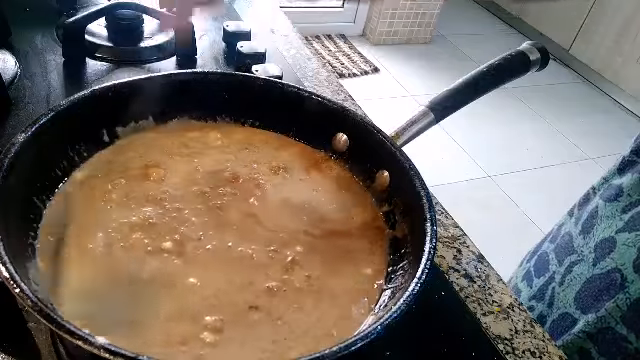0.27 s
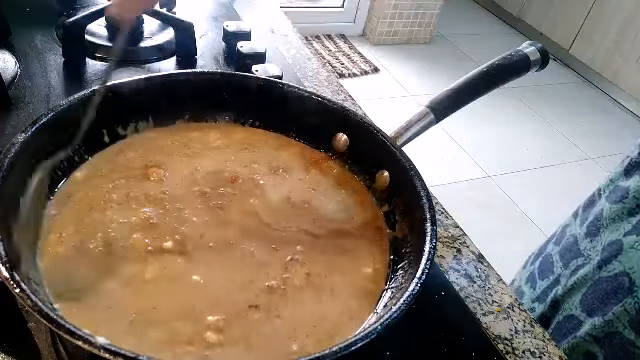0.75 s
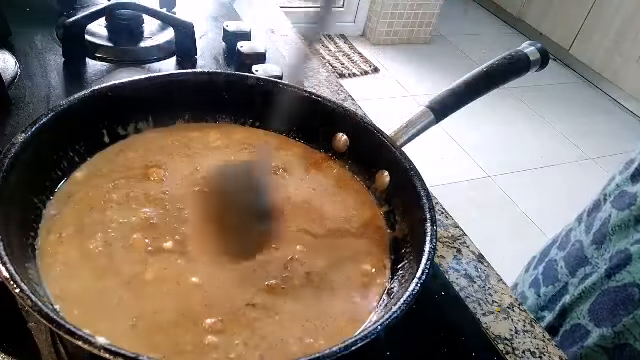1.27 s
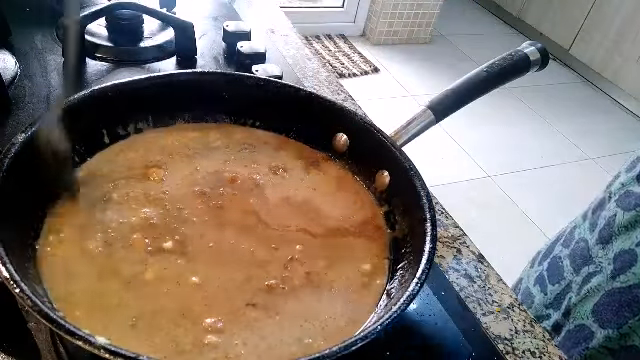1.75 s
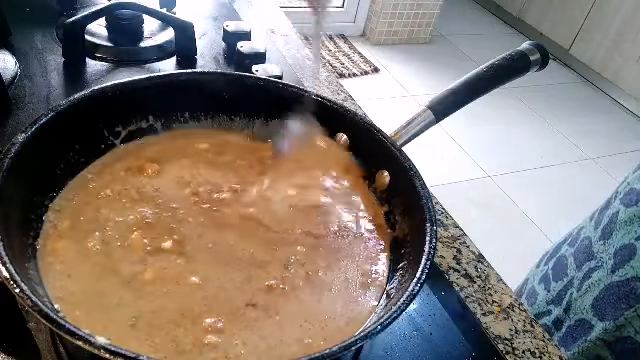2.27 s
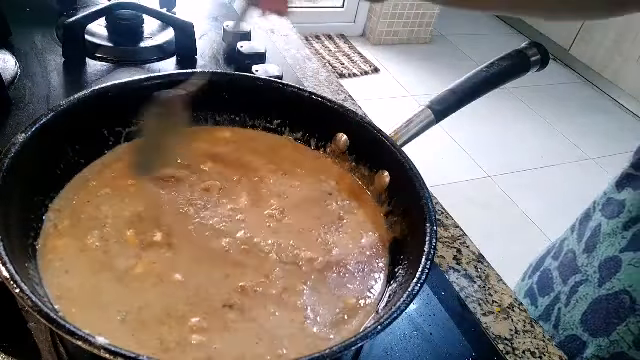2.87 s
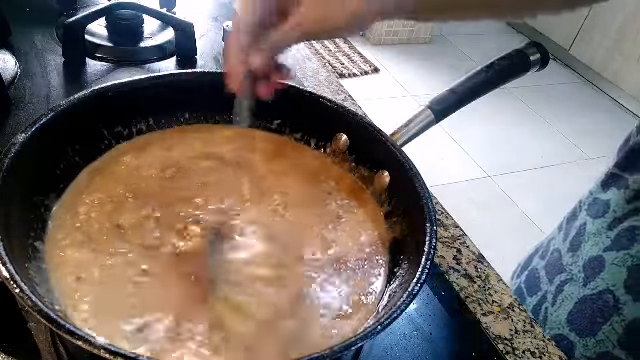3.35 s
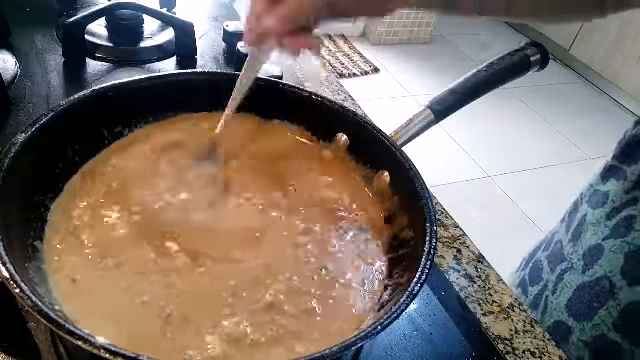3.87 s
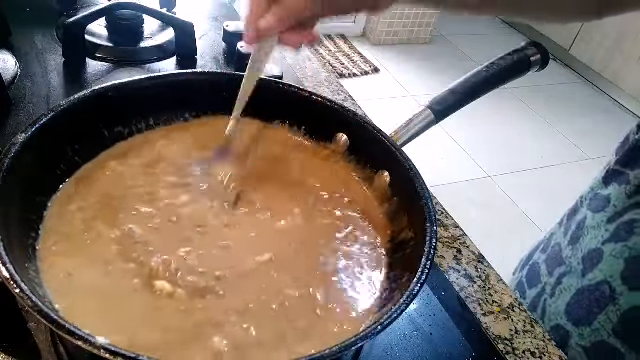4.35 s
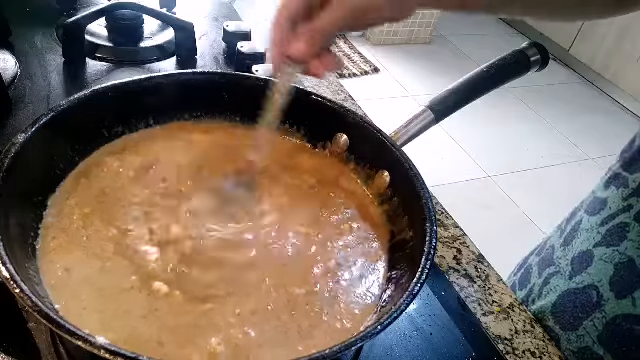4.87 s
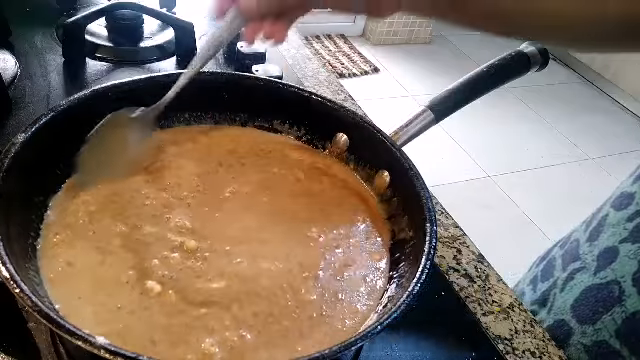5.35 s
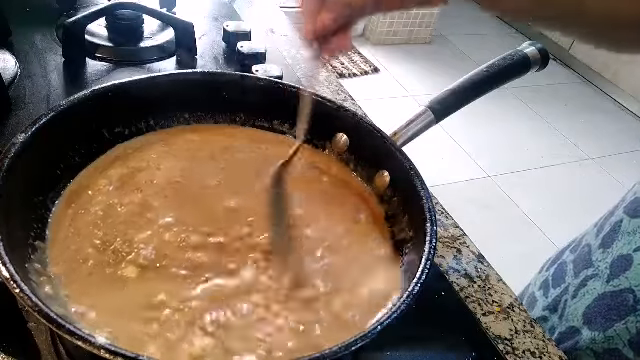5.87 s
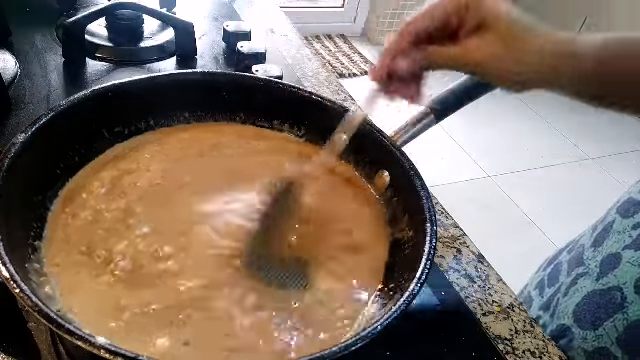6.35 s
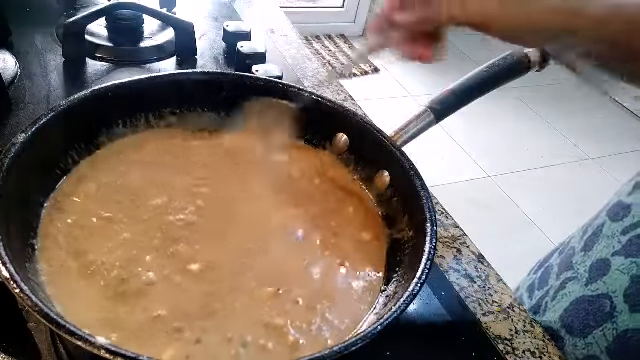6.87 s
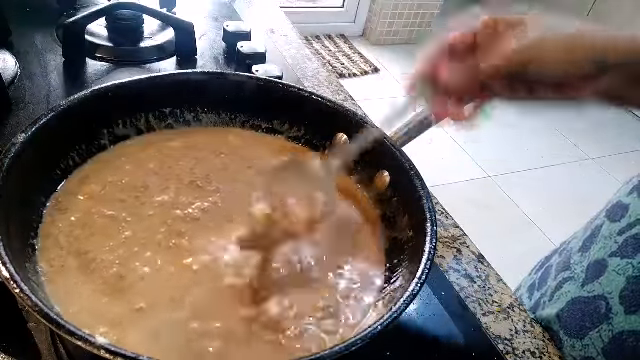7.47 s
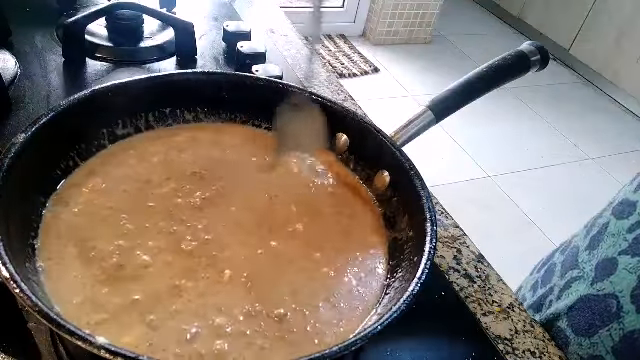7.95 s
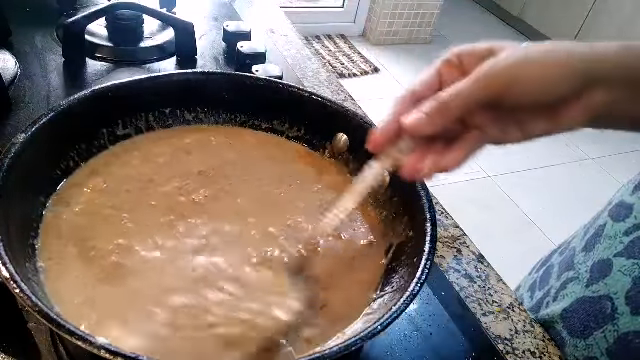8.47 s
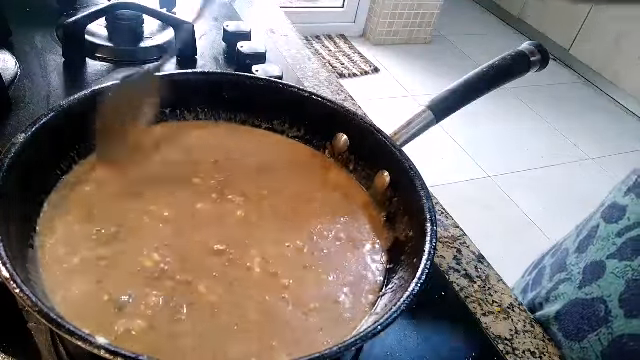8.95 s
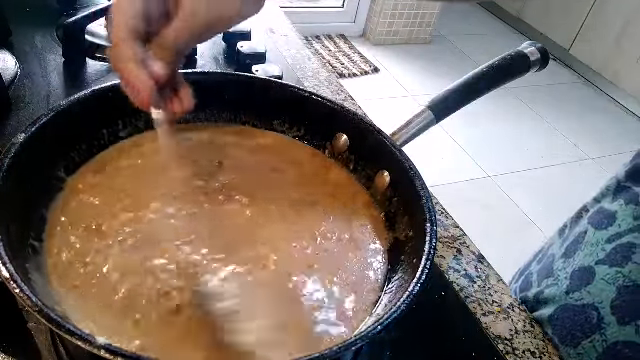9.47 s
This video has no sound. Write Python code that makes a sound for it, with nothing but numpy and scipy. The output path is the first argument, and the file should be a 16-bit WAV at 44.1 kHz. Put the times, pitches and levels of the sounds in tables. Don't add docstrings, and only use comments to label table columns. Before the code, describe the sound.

A close phone microphone in a small kitchen hears a steel spoon working thick food in a frying pan over a quiet, steady low fan hum. At 0.3-0.5 s gritty, bright scrapes run along the rim; a sharp knock at 0.8 leads to more rasping until 1.1. After a gap, stronger scrapes with short sung metallic tones fill 1.6-2.4, while airy sizzle and tiny spits are most noticeable. A quieter lull follows. From 3.05 to 3.5 wet bottom scrapes and clinks cluster, then softer strokes at 3.9-5.0. A knock and scrape come at 5.5, brisk clanks and higher rings at 6.2-6.45, scrapes at 6.8-7.3. The hardest clanks ring at 7.92 and 8.11, with a short room response and scraping tail. A near-quiet pause precedes a last run of uneven scrapes, 9.15-9.7.

```python
import sys
import numpy as np
from scipy import signal
from scipy.fft import rfft, irfft, next_fast_len
from scipy.io import wavfile
from scipy.ndimage import uniform_filter1d, map_coordinates

SR = 44100
rng = np.random.default_rng(int(sys.argv[2]) if len(sys.argv) > 2 else 0)


def to_wav(sig):
    pcm = np.clip(np.atleast_2d(sig), -1, 1) * 32767
    pcm = np.round(pcm).astype(np.int16)
    wavfile.write(sys.argv[1], SR, pcm.T)


def nominal_scale(level):
    x = np.asarray(level, float) / 20
    return 10 ** x


N = 428211

# land_s, full_s, lift_s, rasp_db, ring_db
RIM_STROKES = [(0.324, 0.398, 0.43, -39.5, -40.5), (0.462, 0.505, 0.51, -51, -43.5),
               (0.875, 0.93, 0.98, -39, -42.5), (0.954, 1.006, 1.005, -43, -39.5),
               (1.045, 1.067, 1.12, -48, -43), (1.657, 1.69, 1.81, -42.5, -39.5),
               (1.806, 1.87, 1.96, -50, -46), (2.184, 2.25, 2.322, -40, -46),
               (2.353, 2.39, 2.41, -48, -45.5)]
# land_s, full_s, lift_s, rasp_db, ring_db
BOTTOM_STROKES = [(-0.1, -0.05, 0.15, -66, -56.5), (0.144, 0.168, 0.35, -61, -49.5),
                  (0.776, 0.83, 0.84, -55.5, -46.5), (1.54, 1.58, 1.53, -58.5, -52),
                  (1.868, 1.917, 2, -48, -38.5), (2.004, 2.067, 2.186, -44, -36.5),
                  (2.742, 2.753, 2.745, -56, -72), (3.047, 3.15, 3.42, -52, -47.5),
                  (3.217, 3.306, 3.462, -44, -42.5), (3.375, 3.413, 3.506, -47, -50),
                  (3.85, 3.886, 3.946, -52, -49.5), (3.925, 4.026, 4.02, -53, -42.5),
                  (4.312, 4.337, 4.41, -55, -46), (4.413, 4.505, 4.6, -61, -46),
                  (4.507, 4.53, 4.3, -77, -43.5), (4.596, 4.62, 4.905, -48.5, -44),
                  (4.773, 4.8, 4.93, -56.5, -50), (4.846, 4.884, 4.96, -63, -70),
                  (5.494, 5.531, 5.69, -49, -49), (5.576, 5.63, 5.78, -57, -52.5),
                  (6.194, 6.2, 6.24, -55.5, -41.5), (6.293, 6.33, 6.35, -48, -41),
                  (6.342, 6.374, 6.4, -43, -34.5), (6.42, 6.44, 6.45, -60, -53),
                  (6.815, 6.846, 7.05, -52, -44.5), (6.902, 6.966, 7.12, -45.5, -41),
                  (7.062, 7.11, 7.15, -46, -44), (7.262, 7.272, 7.29, -59, -47),
                  (7.615, 7.63, 7.6, -63.5, -65), (7.922, 7.945, 8.35, -49, -48),
                  (7.96, 8.06, 8.23, -44.5, -56), (8.108, 8.103, 8.14, -40, -28.5),
                  (8.185, 8.214, 8.42, -78, -49), (9.151, 9.163, 9.19, -50.5, -47),
                  (9.2, 9.262, 9.38, -48.5, -44.5), (9.336, 9.39, 9.1, -50, -47.5),
                  (9.43, 9.493, 9.47, -48.5, -47.5), (9.55, 9.59, 9.66, -47, -48),
                  (9.652, 9.71, 9.45, -50.5, -52.5)]
# time_s, driven_pitch_hz, wall_db, bowl_db
CONTACT = [(0.1, 724, -3, -2.5), (0.28, 724, -3, -2), (0.36, 594, -1, -1.5), (0.45, 620, 4.5, 1.5),
           (0.6, 570, 1.5, -1), (0.8, 736, 6, 1), (0.93, 732, 0, -2.5), (1.0, 600, 3.5, -0.5),
           (1.2, 620, 0, -1.5), (1.68, 630, -6, 0.5), (1.75, 620, 1, 8), (1.84, 694, -5, -6.5),
           (1.93, 590, -5.5, -3), (2.01, 690, -5, -5.5), (2.12, 637, -4.5, -0.5), (2.2, 880, -2, 1.5),
           (2.32, 844, -8, 5), (2.4, 625, 4.5, 3.5), (3.1, 710, -8, 1.5), (3.3, 730, -14, 0),
           (3.45, 760, -12, 0), (4.0, 710, -24, 2), (4.3, 1050, -22, -0.5), (4.39, 1090, -15, 0.5),
           (4.44, 770, -15, -0.5), (4.74, 770, -23, -3.5), (4.79, 1110, -14, -2), (4.83, 1060, -9, -2.5),
           (4.88, 720, -11, -2), (5.52, 706, -4, -2), (5.66, 603, -7, 0), (6.2, 1030, -2, 1),
           (6.3, 1130, -2, 1.5), (6.42, 1270, -19, 3), (6.85, 724, -3.5, 2.5), (7.05, 746.6, -16, -1),
           (7.18, 940, -24, -2.5), (7.28, 614, 6, 0), (7.94, 980.3, 2, 0), (8.07, 950, -12, 0.5),
           (8.11, 640, -6.5, -1), (8.35, 650, -6, 1), (9.16, 790, -4.5, -2.5), (9.3, 770, -4, -2),
           (9.38, 652, -9.5, 0.5), (9.55, 620, -10, -4.5), (9.68, 690, -12, -6)]
# pitch_hz, width_hz, level_db
RIM_MODES = [(558.6, 19.3, -2.5), (603.5, 18, 0.5), (637.2, 18.3, 1)]
# pitch_hz, width_hz, level_db
BOTTOM_MODES = [(652.3, 12.8, -5), (724, 21, -0.5), (789, 13.4, -4.5), (872.4, 29, -9)]
# pitch_hz, width_hz, level_db
SIDE_MODES = [(1013, 36, 0), (1087.4, 24, 1), (1174, 35, -1), (1302, 40, -1), (1438, 60, -5.5),
              (940, 26, -5.5)]
# pitch_hz, width_hz, level_db
WALL_MODES = [(295, 25.5, -0.5), (343, 20.5, 1), (374.6, 19, 0), (423.4, 29.6, -7)]
# pitch_hz, width_hz, level_db
BOWL_MODES = [(1576, 80, -4.5), (1747, 260, -3), (2210, 180, -5), (2526, 98, -2), (2795, 70, 0),
              (2943, 49, 1), (3062, 45, 2), (3403, 540, -3)]
# pitch_hz, width_hz, level_db
HANDLE_MODES = [(3616, 67, -5.5), (4600, 67, -10), (4660, 18, -1.5), (5135, 26, 6), (5670, 33, -4)]
# pitch_hz, level_db (per Hz)
EDGE = [(3000, -43), (3750, -7), (4400, -2.5), (5100, 0), (6000, -8), (7600, -7), (8600, -14), (9500, -18),
        (10500, -56)]
# start_s, length_s, pitch_hz, level_db
SINGING = [(0.31, 0.088, 4628, -51), (0.322, 0.175, 647, -45), (0.339, 0.123, 1101, -50),
           (0.38, 0.082, 2740, -54), (0.386, 0.088, 5108, -48), (0.409, 0.082, 4640, -51),
           (0.595, 0.094, 625, -54), (0.96, 0.291, 634, -43), (1.639, 0.129, 655, -42),
           (1.732, 0.082, 1186, -49), (1.848, 0.088, 5025, -53), (1.877, 0.1, 654, -42),
           (1.947, 0.094, 721, -44), (2.005, 0.187, 652, -42), (2.179, 0.088, 3676, -52),
           (2.185, 0.1, 1826, -53), (2.203, 0.1, 1434, -52), (2.226, 0.088, 5076, -46),
           (2.243, 0.1, 715, -52), (2.365, 0.14, 660, -49), (3.12, 0.1, 715, -52), (3.236, 0.094, 723, -47),
           (3.334, 0.164, 769, -46), (3.985, 0.117, 719, -49), (4.519, 0.268, 755, -46),
           (4.763, 0.1, 1020, -48), (5.471, 0.274, 625, -47), (6.318, 0.111, 1177, -42),
           (6.806, 0.111, 717, -49), (6.899, 0.105, 4639, -52), (6.992, 0.256, 726, -43),
           (7.061, 0.088, 1269, -52), (7.061, 0.094, 3746, -52), (7.148, 0.082, 1037, -53),
           (7.241, 0.105, 628, -53), (7.996, 0.105, 886, -52), (7.996, 0.105, 968, -53),
           (8.234, 0.088, 1409, -52), (8.327, 0.094, 624, -51), (9.18, 0.193, 732, -43),
           (9.337, 0.239, 645, -46), (9.563, 0.111, 714, -52)]
# start_s, peak_db, ring_db, thud_db
KNOCKS = [(0.146, -36, -1, 1), (0.8063, -23.5, -0.5, -3), (1.8794, -29.5, -10, -3), (2.1084, -24, -8, -8),
          (2.2163, -27, 3, -14), (3.058, -24.5, -4.5, -26), (3.12, -35, -5, -3), (3.3157, -36.5, 7, 16),
          (3.43, -21, -18, -12), (3.438, -26, -14, -12), (3.467, -43, -12, -12), (3.8593, -34, -10, 7.5),
          (4.3114, -40.5, 2, 3), (4.8, -33, 6, -18), (5.497, -25, -4, -10), (6.1985, -21, -3, -0.5),
          (6.206, -26, 2.5, 4.5), (6.2394, -30, -4, 4), (6.8197, -35, 0, -6), (7.2645, -42, 15, 20),
          (7.9245, -13.5, -10, -6.5), (8.113, -10, -6.5, -17), (8.7745, -59, 16, 18),
          (8.8696, -50, -2.2, 17), (9.153, -30.5, -9, -16), (9.3366, -36, -6, 0)]
# start_s, peak_db
CATCHES = [(0.3431, -47), (0.069, -51), (0.169, -41), (0.1927, -36), (0.7083, -52.5), (0.7517, -47),
           (0.877, -37.5), (0.926, -43), (1.5723, -40), (1.6162, -50), (1.6671, -35), (2.257, -35),
           (3.049, -44), (4.3515, -46), (4.5095, -36.5), (4.602, -38), (4.62, -36), (4.7033, -40),
           (4.8735, -46), (5.129, -40), (6.3455, -39), (6.4427, -26.5), (6.9304, -35), (7.4884, -54),
           (7.629, -33), (9.6056, -46)]
# pitch_hz, width_hz, level_db
CLANG_MODES = [(1040, 44, -1), (1416, 90, -1), (1820, 150, 3.5), (2740, 91, 7), (4640, 100, 1.5)]
# start_s, pitch_hz, peak_db
STRUCK_MODES = [(0.8063, 732, -39), (0.8063, 1303, -37), (0.8063, 2686, -42), (3.058, 716, -44),
                (3.058, 1367, -48), (3.058, 1846, -38), (3.058, 3068, -48), (3.3157, 581, -38),
                (3.43, 759, -35), (3.43, 2799, -33), (3.43, 3058, -35), (3.43, 4506, -40),
                (3.8593, 743, -48), (3.8593, 1303, -44), (5.497, 716, -42), (5.497, 1384, -47),
                (5.497, 3036, -44), (6.1985, 738, -36), (6.1985, 1071, -30), (6.1985, 1394, -41),
                (6.1985, 1712, -41), (6.1985, 2643, -38), (6.2394, 727, -39), (6.2394, 1007, -38),
                (6.4427, 1050, -39), (7.9245, 721, -33), (7.9245, 1028, -29), (7.9245, 1362, -39),
                (7.9245, 2643, -32), (7.9245, 3058, -37), (7.9245, 4678, -39), (8.113, 635, -26),
                (8.113, 1066, -32), (8.113, 1405, -28), (8.113, 2961, -29), (8.113, 4613, -28),
                (8.113, 5249, -31)]
# time_s, level_db
SIZZLE = [(0.0, -64), (0.26, -61.5), (0.55, -53), (0.86, -51.5), (1.22, -60), (1.55, -57.5), (1.75, -48.5),
          (2.35, -52.5), (2.73, -53), (2.95, -57), (3.5, -61.5), (3.8, -67), (5.2, -67.5), (6.1, -71.5),
          (7.45, -64), (7.9, -68), (8.5, -73), (9.1, -72)]
# pitch_hz, level_db (per Hz)
FIZZ = [(7000, -54), (9000, -9.5), (10500, -1), (12000, 2), (14000, 5.5), (15500, 1), (17000, -46)]
# start_s, peak_db, lower_part_db
SPITS = [(0.2823, -42.5, -10), (0.4115, -31, -17), (0.9057, -28.5, -16), (2.4892, -49, -16),
         (2.5092, -42, -3), (2.6228, -42.5, -10), (2.667, -44, -8), (2.7982, -42.5, -4), (2.8988, -42, -15),
         (2.9206, -45, -6.5), (3.0989, -43, -19), (3.586, -45, -15), (4.8319, -42, -9),
         (5.1292, -47, -11.5), (5.2585, -55.5, -4), (5.388, -50, -6), (5.7563, -62, -8), (6.3555, -37, -17),
         (6.429, -39, -25), (7.3238, -43, -13), (7.3703, -46.5, -12), (7.6287, -44, -10),
         (7.7377, -45.5, -9.5), (7.7962, -50.5, -9), (7.8715, -48, -8.5), (8.223, -36, -12),
         (9.2353, -38, -17)]
# pitch_hz, level_db (per Hz)
HUM = [(12, -53), (24, 1), (32, -12), (42, -1), (70, -10.5), (161, -0.5), (187, -1.5), (209, -13),
       (247, -7), (326, -27), (489, -12.5), (695, -32.5), (988, -17), (1300, -51.5), (4000, -66.5)]
# pitch_hz, width_hz, level_db
FAN_BANDS = [(46.3, 11, -10), (99.4, 5.6, -6), (146.3, 5.5, -2), (165.8, 10, -12.5), (71.7, 6, -14.5),
             (130.8, 4.5, -9), (239.3, 5.7, -15)]
# pitch_hz, t60_s
KITCHEN = [(200, 0.25), (2000, 0.53), (12000, 0.049)]
# pitch_hz, likeness (0 to 1)
NEAR = [(60, .95), (200, .9), (350, .8), (700, .75), (1200, .55), (2500, .22), (6000, .3), (15000, .2)]
# pitch_hz, likeness (0 to 1)
FAR = [(60, 0.96), (130, 1), (290, 0.93), (640, 0.046), (1410, 0), (3100, 0.31), (6820, 0.23),
       (15000, 0.11)]
# pitch_hz, left_minus_right_db
PORTS = [(60, 1.5), (92, -1.5), (140, 0.0), (210, 0), (330, -7), (500, -2.5), (770, 4), (1170, 0.5),
         (1790, -1.5), (2740, -1.5), (4190, -0.5), (6410, -5.5), (9810, -12.5), (15000, 19.5)]
# pitch_hz, depth_db
SPARED = [(600, 60), (1000, 13), (1500, 8), (2500, 8), (4000, 12), (6000, 11), (8000, 11), (9300, 4.8),
          (11000, 9), (13500, 14), (15900, 12), (16200, -30)]
# time_s, shortage_db
SHORTAGE = [(0, 4), (0.8, 4), (0.9, 6), (0.95, 4), (2.9, 3), (3.1, 1), (3.6, 0), (3.76, 5.5), (3.9, 0),
            (4.25, 5.5), (4.35, 0), (4.7, 2), (5.0, 0), (5.4, 3), (5.5, -1), (7.1, -1), (7.19, 5),
            (7.38, -1), (7.45, 5), (7.58, 6), (7.62, -2), (8.45, -1.5), (8.75, 5), (8.9, 0), (9.05, 2),
            (9.2, 0), (9.5, 2), (9.7, 2)]

RISE_DB = 9
RASP_FALL, RING_FALL, FIZZ_FALL = 127, 142, 180
RIM_BOWL_DB, BOTTOM_BOWL_DB, RIM_FIZZ_DB, BOTTOM_FIZZ_DB = -7, 1.9, -3.5, -2.5
REST_RING_DB, REST_WALL_DB, REST_BOWL_DB, STEAM_RASP_DB = -60, -58, -72.5, -2
EARLY_BOWL_FALL, BOWL_STAYS_S = 150, 3.03
LINGER_FALL, LINGER_DB, LINGER_HZ = 54, -14, 620
CATCH_RING_DB, CATCH_THUD_DB, BRIGHT_DB = -19, -14, -16.5
LIFE_S, LIFE_GROWS = 0.038, 0.17
RING_T60_S, RING_SHORTENS = .09, .6
SING_WAVER_HZ, SING_SWAY_DB = 7, 2.2
HUM_DB = -44
MOTOR_HZ, MOTOR_DB, MOTOR_SWAY_DB = 175, -49.5, 2.5
LAG = 6 / SR


def strokes():
    _, wall_db, bowl_db = curves(CONTACT)
    drive = ring_pressure()
    ring = pan_ring(lambda body: friction(body, 2.42, 150), spread=0.12, rest=0.55)
    ring = np.hypot(drive, lingering()) * ring
    wall = np.hypot(drive * nominal_scale(wall_db), nominal_scale(REST_WALL_DB)) * friction(modes(WALL_MODES), 1.86, 90)

    rasp = pressure(column=3, fall=RASP_FALL, rim_db=0, bottom_db=0)
    rasp = np.hypot(rasp, nominal_scale(curves(SIZZLE)[0] + STEAM_RASP_DB))
    scoop = pressure(3, RASP_FALL, RIM_BOWL_DB, BOTTOM_BOWL_DB, early_fall=EARLY_BOWL_FALL)
    stays = np.arange(N) / SR > BOWL_STAYS_S
    scoop = np.hypot(scoop, nominal_scale(REST_BOWL_DB) * stays)
    edge = rasp * friction(lambda f: shape(EDGE)(f) + 0.96 * modes(HANDLE_MODES)(f), 1.5, 300)
    edge = edge + scoop * nominal_scale(bowl_db) * friction(modes(BOWL_MODES), 2.0, 200)
    mix = nominal_scale(-1.8) * ring + nominal_scale(0.3) * wall + nominal_scale(2.5) * edge
    return patchy(mix, depth=[(600, 2), (1500, 3.2), (4000, 3.4)])  # (Hz, dB)


def pressure(column, fall, rim_db, bottom_db, early_fall=None):
    rows = np.array(RIM_STROKES + BOTTOM_STROKES)[..., None]
    land, full, lift = rows[:, 0], rows[:, 1], rows[:, 2]
    place_db = np.repeat([rim_db, bottom_db], [len(RIM_STROKES), len(BOTTOM_STROKES)])
    db = rows[:, column] + place_db[:, None]
    t = np.arange(0, N + 44, 44) / SR
    fall = np.where(land < BOWL_STAYS_S, early_fall or fall, fall)
    db = db - RISE_DB * np.clip((full - t) / (full - land), 0, 1)
    db = db - fall * np.maximum(t - lift, 0)
    power = np.sum(nominal_scale(2 * db) * (t >= land), axis=0)
    return np.interp(np.arange(N) / SR, t, np.sqrt(power))


def ring_pressure():
    return pressure(column=4, fall=RING_FALL, rim_db=0, bottom_db=0)


def lingering():
    after = pressure(column=4, fall=LINGER_FALL, rim_db=LINGER_DB, bottom_db=LINGER_DB)
    return np.hypot(after, nominal_scale(REST_RING_DB))


def pan_ring(drive, spread, rest):
    driven = 1 / (1 + (lingering() / (ring_pressure() + 1e-9)) ** 2)
    contact_hz = np.clip(curves(CONTACT)[0], 400, 1600)
    pitch = contact_hz ** driven * LINGER_HZ ** (1 - driven)
    share = []
    for hz, part in ((595, 0.42), (740, 0.71), (1150, 1.0)):
        share.append(part * rest + np.exp(-(np.log(pitch / hz) / spread) ** 2))
    total = np.sqrt(sum(w ** 2 for w in share))
    families = (RIM_MODES, BOTTOM_MODES, SIDE_MODES)
    return sum(w / total * drive(modes(family)) for w, family in zip(share, families))


def patchy(x, depth):
    hz, _, z = signal.stft(x, SR, nperseg=1024, noverlap=768)
    field = uniform_filter1d(rng.standard_normal(z.shape[1:]), size=2, axis=0)
    field = unit(uniform_filter1d(field, size=13, axis=1))
    z = z * nominal_scale(along(depth, hz)[:, None] * (field - 0.5847))
    return signal.istft(z, nperseg=1024, noverlap=768)[1][:, :N]


def singing():
    out = np.zeros((2, N + SR))
    for s, length, hz, db in SINGING:
        swell = np.hanning(round(min(length, .39) * SR)) ** .7
        add(out, s, hz, nominal_scale(db) * swell, waver_hz=SING_WAVER_HZ)
    return out[:, :N] * nominal_scale(SING_SWAY_DB * wobble(45))


def knocks():
    snags = [(s, db, CATCH_RING_DB, CATCH_THUD_DB) for s, db in CATCHES]
    s, db, ring_db, thud_db = np.transpose(KNOCKS + snags)
    t60 = LIFE_S * nominal_scale(LIFE_GROWS * (db + 30))
    spoon = filtered(bursts(s, db - 2.5, t60), lambda f: (
        .7 * modes(BOWL_MODES)(f) + modes(CLANG_MODES)(f) + 0.44 * shape(EDGE)(f)))
    crack = filtered(bursts(s, db + 6.5, 0.2 * t60), lambda f: f / (f + 600) * nominal_scale(-f / 600))
    push = bursts(s, db + ring_db + 15, 0.33 * t60)
    pan = pan_ring(lambda body: filtered(push, body), spread=0.26, rest=0.85)
    pan = pan + nominal_scale(-7.0) * filtered(push, modes(WALL_MODES))
    bright = filtered(bursts(s, db + BRIGHT_DB + 1.0, 2.2 * t60), shape(FIZZ))
    hob = modes([(121, 51, 0.5), (180, 256, -8.5)])
    thud = filtered(bursts(s, db + thud_db + 17.5, 1.45 * t60), hob)
    return spoon + crack + pan + bright + thud


def struck_modes():
    out, t = np.zeros((2, N + SR)), np.arange(SR // 5) / SR
    for s, hz, db in STRUCK_MODES:
        t60 = RING_T60_S * (1000 / hz) ** RING_SHORTENS
        add(out, s, hz, nominal_scale(db - 60 * t / t60) * (1 - np.exp(-t / .0007)), waver_hz=4)
    return out[:, :N]


def sizzle():
    bared = pressure(column=3, fall=FIZZ_FALL, rim_db=RIM_FIZZ_DB, bottom_db=BOTTOM_FIZZ_DB)
    level = np.hypot(bared, nominal_scale(curves(SIZZLE)[0]))
    fizz = level * nominal_scale(1.0) * friction(shape(FIZZ), 1.6, 250)
    s, db, low_db = np.transpose(SPITS)
    life = np.full(len(s), .035)
    spit = filtered(bursts(s, db + 2.0, life), shape(FIZZ))
    spit_low = filtered(bursts(s, db + low_db + 15.5, life), shape(EDGE))
    return fizz + spit + spit_low


def hum():
    air = friction(shape(HUM), 0.67, 12)
    motor = friction(modes(FAN_BANDS), 0.2, 3.2)
    phase = 2 * np.pi * np.cumsum(MOTOR_HZ + 0.804 * wobble(3)) / SR
    line = nominal_scale(MOTOR_DB + MOTOR_SWAY_DB * wobble(4)) * np.sin(phase)
    return alike(nominal_scale(HUM_DB - 3.5) * air + nominal_scale(HUM_DB - 5.0) * motor, FAR) + line


def kitchen(x):
    hz, t, z = signal.stft(rng.standard_normal((2, SR // 3)), SR, nperseg=256)
    tail = signal.istft(z * nominal_scale(-60 * t / along(KITCHEN, hz)[:, None]), SR, nperseg=256)[1]
    return signal.fftconvolve(x, tail / np.linalg.norm(tail[0]), axes=1)[:, :N]


def friction(response, grit_db, rate):
    grit = nominal_scale(grit_db * (wobble(rate) + .6 * wobble(rate / 7)))
    return unit(filtered(grit * rng.standard_normal((2, N)), response))


def bursts(times, peak_db, t60):
    out, t = np.zeros((2, N + SR)), np.arange(SR // 8) / SR
    for s, db, life in zip(times, peak_db, t60):
        decay = nominal_scale(db - 60 * t / max(life, .003))
        out[:, round(s * SR):][:, :len(t)] += decay * rng.standard_normal((2, len(t)))
    return out[:, :N]


def add(out, s, hz, envelope, waver_hz):
    drift = np.interp(np.arange(len(envelope)) / SR, np.arange(40) / 100, rng.standard_normal(40))
    phase = 2 * np.pi * (np.cumsum(hz + waver_hz * drift) / SR + rng.random((2, 1)))
    out[:, round(s * SR):][:, :len(envelope)] += envelope * np.sin(phase)


def modes(table):
    def response(f):
        total = 0
        for k, (c, w, db) in enumerate(table):
            total = total + (-1) ** k * nominal_scale(db) * 1j * f * w / (c * c - f * f + 1j * f * w)
        return total
    return response


def shape(points):
    def response(f):
        cepstrum = irfft(along(points, f) * np.log(10) / 20)
        cepstrum[1:len(f) - 1] *= 2
        cepstrum[len(f):] = 0
        return np.exp(rfft(cepstrum))
    return response


def filtered(x, response):
    m = next_fast_len(N + SR // 2)
    low, part = np.divmod(np.arange(m // 2 + 1), 8)
    coarse = response(np.arange(low[-1] + 2) * 8 * SR / m)
    fine = coarse[..., low] + part / 8 * np.diff(coarse)[..., low]
    return irfft(rfft(x, m) * fine, m)[..., :N]


def alike(pair, likeness):
    def turn(hz):
        angle = np.arccos(np.clip(along(likeness, hz), -1, 1)) / 2
        return np.array([np.cos(angle), np.sin(angle)])
    mid, side = filtered(pair, turn)
    return np.array([mid + side, mid - side])


def unit(x):
    return x / np.sqrt(np.mean(x ** 2) + 1e-20)


def along(points, hz):
    f, v = np.transpose(points)
    return np.interp(np.log(hz + 1), np.log(f + 1), v)


def curves(rows):
    s, *cols = np.transpose(rows)
    return [np.interp(np.arange(N) / SR, s, c) for c in cols]


def wobble(rate):
    knots = rng.standard_normal(int(N * rate / SR) + 4)
    return map_coordinates(knots, [np.arange(N) * rate / SR], order=1)


def scene():
    blows = knocks() + nominal_scale(2.5) * struck_modes()
    rubbing = strokes() + nominal_scale(1.5) * singing()
    near = rubbing + sizzle() + blows + nominal_scale(-13.5) * kitchen(blows)
    return alike(near, NEAR) + hum()


def starve(x, scatter_db, step_db):
    lead, sine = 1024 - 343, np.sin(np.pi * (np.arange(2048) + .5) / 2048)
    hz, t, z = signal.stft(np.pad(x, ((0, 0), (lead, 0))), SR, window=sine, nperseg=2048)
    edges = np.r_[np.arange(0, 96, 8), np.geomspace(96, 320, 16), np.arange(320, 1025, 32)]
    edges = np.unique(np.round(edges).astype(int))
    width = np.diff(np.r_[edges, len(hz)])
    power = np.add.reduceat(np.abs(z) ** 2, edges, axis=1) / width[:, None]
    audible = (hz[edges] > 1000) & (hz[edges] < 15500)
    loud = np.mean(power[:, audible], axis=1, keepdims=True)

    chance = rng.standard_normal(power.shape) + rng.standard_normal(power.shape[1:])
    luck = scatter_db * unit(uniform_filter1d(chance, size=3, axis=2))
    luck = luck + np.interp(t, *np.transpose(SHORTAGE))
    kept = power > loud * nominal_scale(2 * (luck - along(SPARED, hz[edges])[:, None]))
    floor = loud * nominal_scale(-2 * (along(SPARED, hz)[:, None] + step_db))
    thinned = z * (np.abs(z) ** 2 > floor) * np.repeat(kept, width, axis=1)
    struck = loud[..., 2:] > nominal_scale(2 * 14) * loud[..., :-2]
    thinned[..., 2:] = np.where(struck, z[..., 2:], thinned[..., 2:])
    thinned[..., :2] = (z * (np.abs(z) ** 2 > floor))[..., :2]
    return signal.istft(thinned, SR, window=sine, nperseg=2048)[1][:, lead:lead + N]


def low_pass(x):
    return signal.sosfilt(signal.butter(12, 16480, fs=SR, output="sos"), x)


def record(dry):
    half = np.array([[.5], [-.5]])

    def port(hz):
        db = along(PORTS, hz)
        tilt = nominal_scale(db * half) / np.sqrt(np.cosh(db * np.log(10) / 20))
        late = np.exp(-2j * np.pi * hz * LAG * half)
        return tilt * late / np.sqrt(1 + (37 / (hz + 1)) ** 8)
    thin = starve(filtered(dry, port), scatter_db=4.8, step_db=-.5)
    return low_pass(thin)


dry = scene()
out = record(dry)
to_wav(out)
```